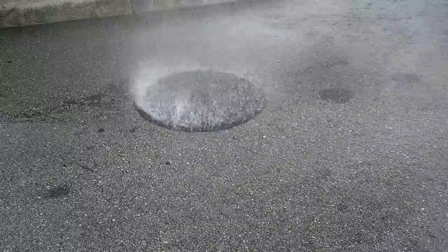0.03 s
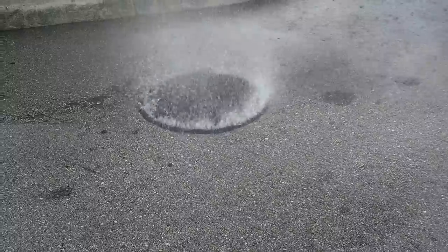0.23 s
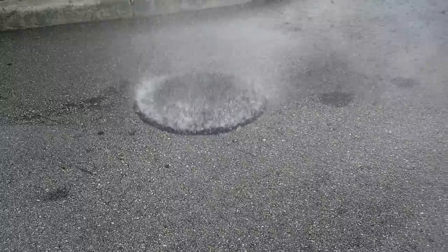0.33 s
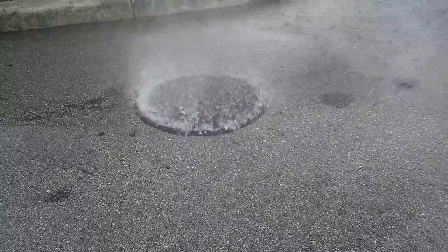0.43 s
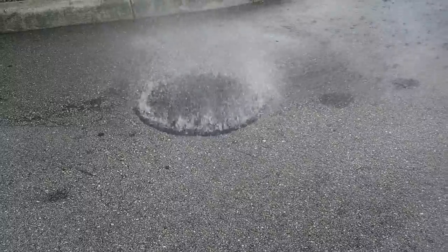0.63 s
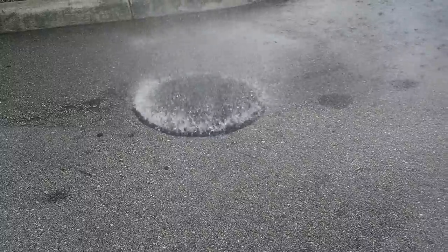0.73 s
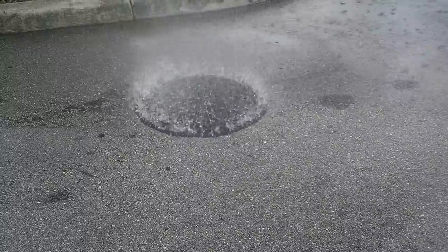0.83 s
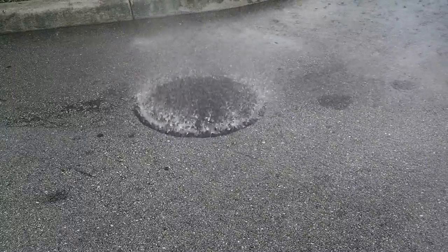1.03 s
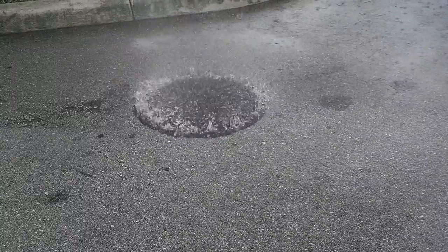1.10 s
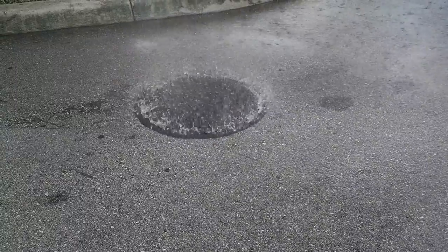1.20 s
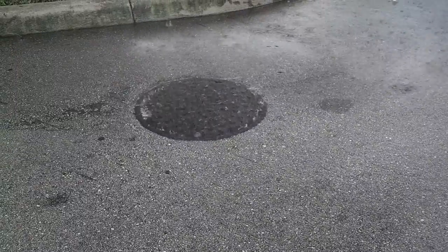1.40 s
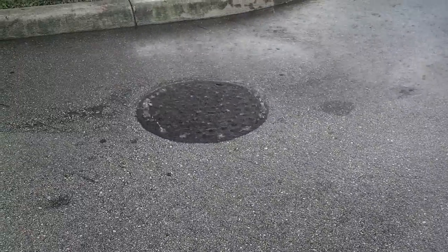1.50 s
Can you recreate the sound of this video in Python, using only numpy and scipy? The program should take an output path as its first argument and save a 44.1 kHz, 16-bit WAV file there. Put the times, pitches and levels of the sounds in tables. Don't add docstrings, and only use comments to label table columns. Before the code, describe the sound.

A loose metal drain cover bangs and chatters as pressurised water and air burst around it, wet thuds and hollow knocks growing harder until a final clank, over low rain wash, heard close on a phone.

```python
import sys
import numpy as np
from scipy import signal
from scipy.fft import rfft, irfft
from scipy.io import wavfile
from scipy.ndimage import uniform_filter1d

SR = 44100
rng = np.random.default_rng(int(sys.argv[2]) if len(sys.argv) > 2 else 0)


def put_to_file(sound):
    columns = np.atleast_2d(sound).T
    safe = np.clip(columns, -1, 1)
    whole_steps = np.round(safe * 32767)
    wavfile.write(sys.argv[1], SR, whole_steps.astype(np.int16))


def boost_factor(decibels):
    exponent = np.asarray(decibels, float) / 20
    return 10 ** exponent


N = 68355


def evened(x):
    return x / np.sqrt(np.mean(x ** 2) + 1e-20)


def read(points, hz):
    f, value = np.transpose(points)
    return np.interp(np.log(hz + 1), np.log(f + 1), value)


def colour(x, spectrum):
    return irfft(rfft(x) * boost_factor(read(spectrum, np.fft.rfftfreq(N, 1 / SR))), N)


def decay(t, t60):
    return boost_factor(-60 * t / t60)


def bursts(times, dbs, shape):
    train = np.zeros(N)
    np.add.at(train, np.round(np.asarray(times) * SR).astype(int), boost_factor(dbs))
    return signal.oaconvolve(train, shape)[:N]


def noise(spectrum, patch_db, flicker_db):
    frames = N // 128 + 5
    a, b, patches = rng.standard_normal((frames, 257, 3)).T
    patches = uniform_filter1d(patches, size=6, axis=0)
    patches = evened(uniform_filter1d(patches, size=20, axis=1))
    flicker = rng.standard_normal(frames)
    z = (a + 1j * b) * boost_factor(patch_db * patches + flicker_db * flicker)
    hiss = signal.istft(z, nperseg=512, noverlap=384)[1][:N]
    return evened(colour(hiss, spectrum))


def ringing(hz, t60):
    taps_per_s, spread_db, steady = 900, 3, 0.72
    chance, strength, sign = rng.random((3, N))
    taps = (chance < taps_per_s / SR) * boost_factor(-spread_db * np.log(1 - strength)) * np.sign(sign - 0.5)
    t = np.arange(5000) / SR
    z = signal.oaconvolve(taps, decay(t, t60) * np.exp(2j * np.pi * hz * t))[:N]
    return evened(z.imag / (abs(z) + 0.032) ** steady)


# f/Hz, level/dB
WASH_COLOUR = [(15, -89), (25, -36), (271, 1), (528, -4), (649, -5.5), (2750, -23.5), (4060, -25.5),
               (5470, -24), (6000, -24.5), (7800, -70), (13200, -120)]
# f/Hz, level/dB
WASH_APART = [(40, 20), (110, 4.5), (400, -18), (800, -2), (2000, -3.5)]
# t/s, level/dB
RUNOFF_SWELL = [
    (0.099, -2),
    (.5, 0),
    (.8, 4.5),
    (1.1, 7),
    (1.33, 5),
    (1.5, 5),
]


def wash():
    wash_db, apart_db, patch_db = -40.5, -3, 1
    swell = boost_factor(wash_db + np.interp(np.arange(N) / SR, *np.transpose(RUNOFF_SWELL)))
    shared = swell * noise(WASH_COLOUR, patch_db, 0.65)
    apart = []
    for _ in "LR":
        own = colour(noise(WASH_COLOUR, patch_db, 0.36), WASH_APART)
        apart.append(boost_factor(apart_db) * swell * own)
    return shared, np.array(apart)


# t/s, level/dB
JET_PRESSURE = [(0.09, -54), (0.099, -49.5), (0.164, -53), (0.282, -49.5), (0.6, -47.5), (0.608, -47),
                (1.042, -43), (1.058, -47), (1.09, -40.5), (1.11, -46), (1.138, -39.5), (1.184, -46),
                (1.192, -42.5), (1.342, -53.5), (1.502, -52.5), (1.51, -50)]
# f/Hz, level/dB
SPRAY_COLOUR = [(300, -69), (1500, 0), (3000, 2.5), (5600, -2.5), (9300, 3), (11500, -3.5), (15500, -2.5),
                (20000, -3.5)]


def spray():
    jet_db = np.interp(np.arange(N) / SR, *np.transpose(JET_PRESSURE))
    return boost_factor(jet_db + 6) * noise(SPRAY_COLOUR, patch_db=2, flicker_db=1.6)


# t/s, level/dB
THROWN_SPRAY = [
    (.3, -19),
    (.595, -16.5),
    (.686, -15.5),
    (.76, -26),
    (0.931, -11),
    (1.19, -23),
    (1.21, -9),
    (1.238, -11),
]
# f/Hz, level/dB
THROWN_COLOUR = [(1800, -16), (3100, 0.5), (4700, 2.5), (5500, -7.5), (12000, -40)]
# t/s, boom level/dB, slap level/dB, gulp level/dB
DROPS = [(0.081, -30, -29.5, -52.5), (0.155, -38, -28.5, -40), (0.227, -23.5, -22.5, -37),
         (0.299, -23, -22.5, -47), (0.372, -32, -37, -46), (0.446, -31, -27.5, -52),
         (0.518, -31.5, -22.5, -38), (0.588, -19.5, -25, -36), (0.655, -33, -18, -36.5),
         (0.715, -21, -34, -48), (0.736, -35, -34, -42), (0.793, -27, -36, -63), (0.862, -24.5, -24.5, -47),
         (0.872, -23, -33, -32.5), (0.927, -16, -17.5, -32), (0.979, -19, -20, -59), (1.049, -27, -26, -40),
         (1.122, -33.5, -29.5, -41), (1.165, -22.5, -17.5, -38), (1.189, -19.5, -21, -37),
         (1.21, -19.5, -14, -33.5), (1.232, -21.5, -15, -31)]
# f/Hz, level/dB
SLAP_COLOUR = [(200, -9), (450, 1), (800, 6.5), (1300, -4.5), (2000, -13.5), (4200, -40), (6000, -51)]
# f/Hz, t60/s, level/dB
SHAFT_AIR = [(274, 0.24, 0), (403, 0.12, -8.5), (518, 0.068, -1.5), (380, 0.012, -14.5)]


def thuds():
    t = np.arange(6000) / SR
    rise = 1 - np.exp(-t / 0.0043)
    slap_rise = 1 - np.exp(-t / 0.0019)
    s, boom_db, slap_db, gulp_db = np.transpose(DROPS)
    splash_s, splash_db = np.transpose(THROWN_SPRAY)
    grain = np.repeat(boost_factor(0.5 * rng.standard_normal(N // 64 + 1)), 64)[:N]
    drops = rng.standard_normal(N) * grain

    slap = bursts(s, slap_db - 1.5, slap_rise * decay(t, 0.073)) * evened(colour(drops, SLAP_COLOUR))
    thrown = bursts(splash_s, splash_db - 25.5, rise * decay(t, 0.2))
    thrown = thrown * evened(colour(drops, THROWN_COLOUR))

    air = sum(boost_factor(db) * ringing(hz, t60) for hz, t60, db in SHAFT_AIR)
    boom = bursts(s, boom_db - 2.5, rise * decay(t, 0.088)) * air

    gulp_hz, gulp_rise_hz_per_s, gulp_lead_s = 137.2, 660, 0.00475
    gulp = np.sin(2 * np.pi * (gulp_hz + gulp_rise_hz_per_s * t) * t)
    gulp = boost_factor(10.5) * rise * decay(t, 0.079) * gulp
    return slap + thrown + boom + bursts(s - gulp_lead_s, gulp_db, gulp)


# t/s, level/dB, f/Hz
SEAT_KNOCKS = [(0.156, -30, 440), (.229, -17, 370), (0.295, -29, 275), (0.316, -25.5, 293),
               (0.374, -29.5, 263), (.443, -31, 790), (0.449, -22.5, 298), (.523, -34, 347),
               (.588, -25, 294), (0.592, -32, 417), (0.61, -19, 414), (0.66, -20, 412), (.672, -14, 480),
               (0.723, -27, 284), (.731, -26, 280), (0.802, -27.5, 270), (0.874, -21, 332),
               (0.905, -18.5, 308), (0.929, -23.5, 490), (0.934, -18.5, 355), (0.952, -16, 454),
               (.982, -13.5, 278), (1.062, -30, 302), (1.12, -32, 295), (1.17, -19, 600),
               (1.181, -13.5, 350), (1.199, -22, 295), (1.214, -15, 300), (1.221, -26, 453),
               (1.232, -14, 403), (0.683, -24, 478), (1.3, -26.5, 328), (1.339, -31, 278),
               (1.357, -35, 306), (1.39, -28.5, 275)]


def knocks():
    cycles, knock_db = 2.48, -2
    out = np.zeros(N)
    for s, db, hz in SEAT_KNOCKS:
        u = np.arange(0, cycles, hz / SR)
        swell = np.sin(np.pi * (u / cycles) ** 0.69) ** 2
        out[round(s * SR):][:len(u)] += boost_factor(db + knock_db) * swell * np.sin(2 * np.pi * u)
    return out


# t/s, length/s, middle level/dB, low level/dB,
# high level/dB
RIM_CLANKS = [(0.168, .022, -32.5, -34.5, -48), (0.198, 0.019, -37, -48, -49), (.228, .01, -37, -27.5, -45),
              (0.236, 0.023, -33, -29.5, -33), (.262, 0.021, -25.5, -31, -37.5),
              (.288, 0.0069, -34, -33, -39), (0.302, 0.007, -24, -31, -29), (0.315, 0.02, -27.5, -32, -33),
              (0.33, 0.025, -25, -30.5, -33.5), (0.365, 0.018, -52, -32, -43), (.384, 0.01, -25, -36, -36),
              (0.403, 0.027, -40.5, -49, -45), (0.441, 0.038, -38.5, -41, -65),
              (0.483, 0.026, -44, -43, -43), (0.524, 0.019, -32, -30.5, -42),
              (0.537, 0.028, -25, -48, -33.5), (0.567, 0.03, -32.5, -45, -48),
              (.596, 0.0087, -18.5, -20.5, -27), (0.609, 0.016, -40, -20.5, -25.5),
              (0.626, 0.019, -22.5, -30, -32.5), (0.664, .022, -31, -22, -44),
              (0.683, 0.02, -18.5, -19, -24), (0.701, 0.017, -27.5, -22, -35.5), (.72, .012, -37, -27, -40),
              (0.735, 0.017, -23, -33, -37.5), (.76, 0.028, -36, -44, -39), (0.79, 0.03, -39, -37.5, -45),
              (0.879, 0.017, -23, -28.5, -36), (0.899, .018, -29.5, -33, -35),
              (0.924, 0.033, -28, -33, -31), (0.956, 0.024, -17, -22, -31), (.984, .008, -29, -34, -33.5),
              (0.998, 0.013, -20, -27.5, -34), (1.016, 0.011, -28, -29, -38),
              (1.054, 0.0056, -44, -21.5, -46), (1.06, 0.0065, -18, -32, -40),
              (1.159, 0.0071, -28, -40, -36), (1.182, 0.02, -19, -29.5, -28),
              (1.221, 0.012, -21, -21, -25.5), (1.238, 0.015, -29, -16.5, -45),
              (1.247, 0.016, -12.5, -14, -26),
    (1.276, 0.014, -31, -36, -35.5),
]
MODE_HZ = [
    [845, 470, 635],
    [1038, 1090, 930],
    [1740, 1625, 2635, 2725, 3640, 4110, 4670],
]
# t60/s, level/dB
LOW_MODES = [(0.26, -0.5), (0.12, -11.5), (0.056, -15)]
MIDDLE_MODES = [(0.15, 0.5), (0.15, -13), (0.048, -12.5)]
HIGH_MODES = [(0.057, -2.5), (0.096, -10), (0.081, -6.5), (0.097, -22), (0.094, -23), (0.09, -21.5),
              (0.032, -20.5)]
GROUP_LEVELS = [-3.5, -5, -4]
# f/Hz, level/dB
GRIT_COLOUR = [(300, -11), (1200, -2), (2200, -6), (3400, -15), (4700, -4.5), (5600, -7.5), (16000, -31)]


def cover():
    rise_s, sag_db_per_s, damp_t60_s = 0.0016, 53, 0.048
    t = np.arange(4000) / SR
    power = np.zeros((3, N))
    for s, length, mid_db, low_db, high_db in RIM_CLANKS:
        seated = np.maximum(t - length, 0)
        lift = (1 - np.exp(-t / rise_s)) * boost_factor(-sag_db_per_s * t) * decay(seated, damp_t60_s)
        levels = boost_factor(np.array([low_db, mid_db, high_db]))[:, None]
        power[:, round(s * SR):][:, :len(t)] += (levels * lift) ** 2
    lifts = np.sqrt(power)

    out = boost_factor(-14.5) * lifts[2] * noise(GRIT_COLOUR, patch_db=1.2, flicker_db=1.0)
    groups = zip(MODE_HZ, (LOW_MODES, MIDDLE_MODES, HIGH_MODES), lifts, GROUP_LEVELS)
    for pitches, modes, lift, group_db in groups:
        tone = sum(boost_factor(db) * ringing(hz, t60) for hz, (t60, db) in zip(pitches, modes))
        out += boost_factor(group_db) * lift * tone
    return out


# f/Hz, level/dB
PORT_LEVEL = [(60, 0), (250, -5), (600, -7), (950, -1.5), (1850, 6.5), (2300, 2.5)]
# f/Hz, phase turn [rad]
PORT_PHASE = [(45, -1.2), (75, -0.7), (140, -2.5), (500, -0.85), (900, -0.86), (1150, -0.5), (1800, 0.4),
              (2100, 0.03)]


def scene():
    shared, apart = wash()
    left = shared + spray() + thuds() + knocks() + cover()
    hz = np.fft.rfftfreq(N, 1 / SR)
    lag = 2 * np.pi * hz * 16 / SR
    case = abs(np.sin(np.clip(lag, np.pi / 2, 2 * np.pi)))
    port = -boost_factor(case * read(PORT_LEVEL, hz)) * np.exp(1j * (case * read(PORT_PHASE, hz) - lag))
    right = irfft(rfft(left) * port, N)
    return np.array([left, right]) + irfft(rfft(apart) * case ** 2, N)


def band_limit(x):
    return signal.sosfilt(signal.butter(12, 16950, fs=SR, output="sos"), x)


# low f/Hz, high f/Hz, share of time [0-1]
DROPPED_BANDS = [(2740, 2900, 1), (5170, 5685, .9), (5685, 6000, .08), (7900, 8200, .15), (8200, 8400, .9),
                 (8400, 8600, .25), (10600, 10850, .2), (10850, 11300, 1), (11300, 11700, .4),
                 (13100, 13600, .12), (13600, 13900, 1), (13900, 14470, .95)]
# low f/Hz, high f/Hz, start t/s, end t/s
TIMED_GAPS = [(2330, 2585, .32, .41), (2330, 2585, .44, .49), (2585, 2800, .09, .16),
              (2585, 2800, .25, .66), (2585, 2800, .74, 1.18), (2860, 3120, .16, .26),
              (2860, 3150, .41, .9), (2860, 3120, .97, 1.12)]


def record(dry):
    bass_cut = signal.butter(N=4, Wn=100.6, btype="high", fs=SR, output="sos")
    left, right = signal.sosfilt(bass_cut, dry)
    z = signal.stft(np.array([left + right, left - right]) / 2, nperseg=1024)[2]
    frames = z.shape[2]
    hz = np.fft.rfftfreq(1024, 1 / SR)[:, None]
    t = np.arange(frames) * 512 / SR

    held = np.repeat(rng.random((len(DROPPED_BANDS), frames // 3 + 1)), 3, axis=1)[:, :frames]
    for (low, high, often), draw in zip(DROPPED_BANDS, held):
        z[0] *= 1 - ((hz >= low) & (hz < high) & (draw < often))
    for low, high, start, end in TIMED_GAPS:
        z[0] *= 1 - ((hz >= low) & (hz < high) & (t > start) & (t < end))

    blur = 0.47 * np.clip(hz / 3000 - 0.5, 0, 1) + 0.39 * np.clip(1 - abs(hz - 380) / 260, 0, 1)
    z = z * np.exp(1j * blur * 2 * rng.standard_normal(z.shape))
    mid, side = signal.istft(z, nperseg=1024)[1][:, :N]

    treble_cut = signal.firwin(511, 15720, window=("kaiser", 9), fs=SR)[None]
    limited = signal.oaconvolve([mid + side, mid - side], treble_cut, "same")
    start_s, fade_s = 0.071, 0.0011
    fade = np.clip((np.arange(N) / SR - start_s) / fade_s, 0, 1)
    return band_limit(limited * fade)


dry = scene()
out = record(dry)
put_to_file(out)
```